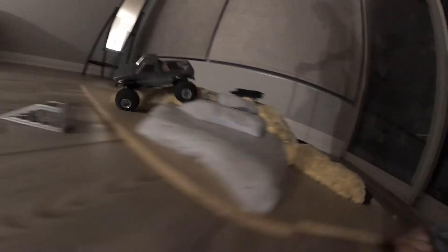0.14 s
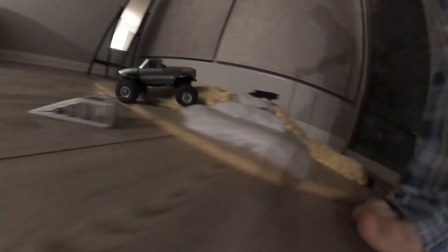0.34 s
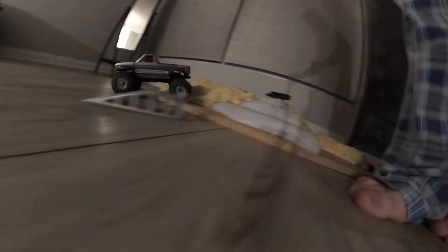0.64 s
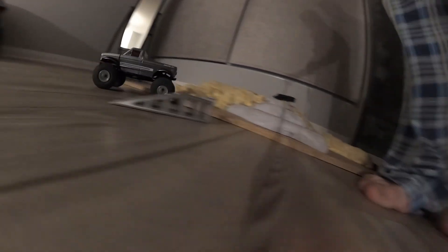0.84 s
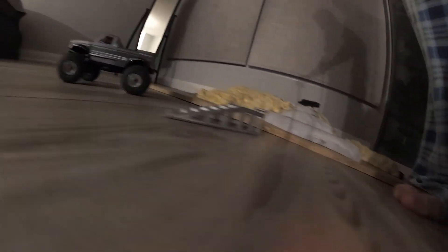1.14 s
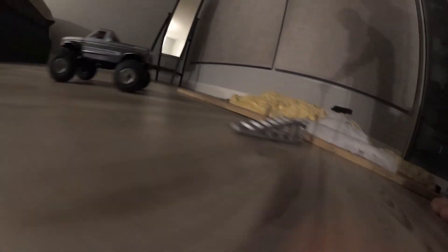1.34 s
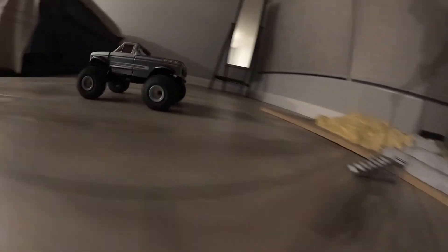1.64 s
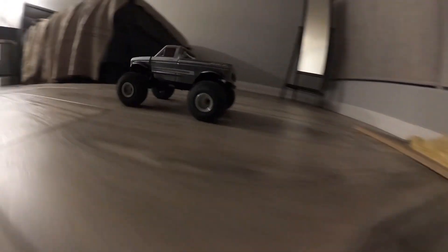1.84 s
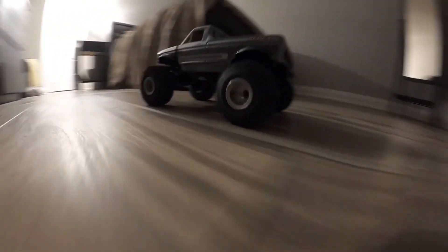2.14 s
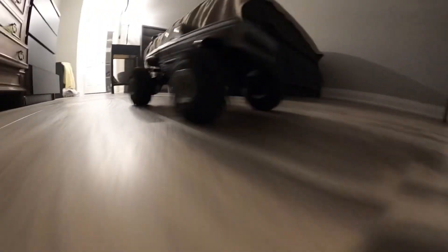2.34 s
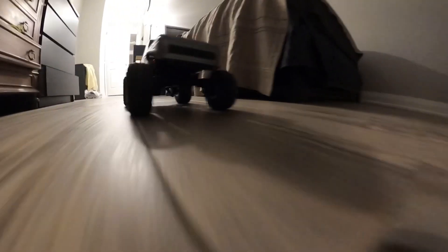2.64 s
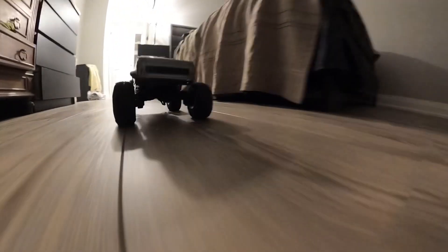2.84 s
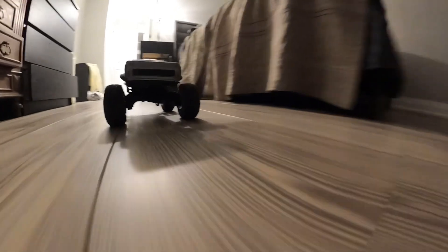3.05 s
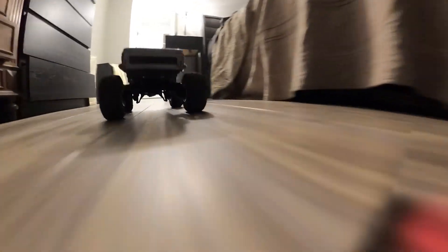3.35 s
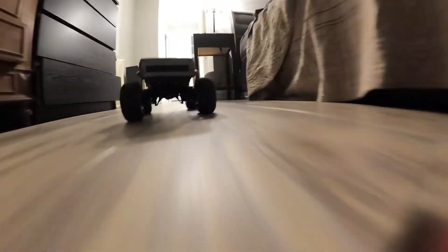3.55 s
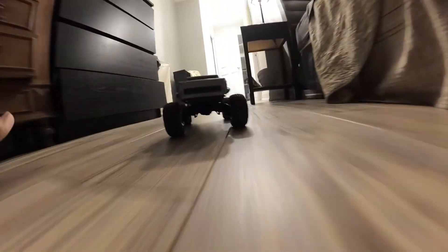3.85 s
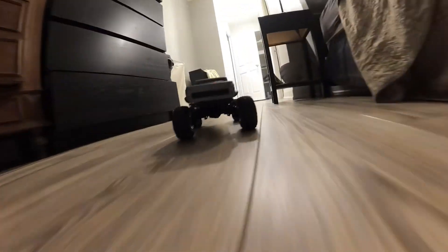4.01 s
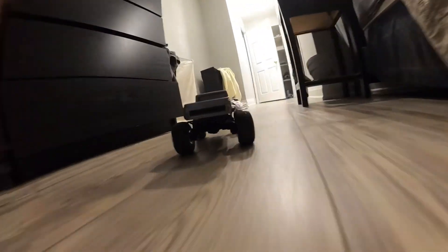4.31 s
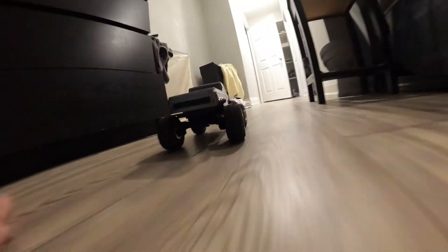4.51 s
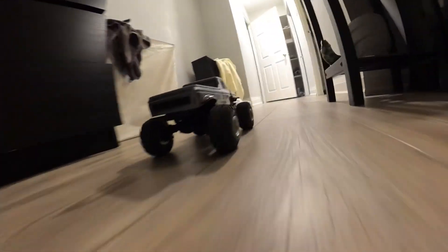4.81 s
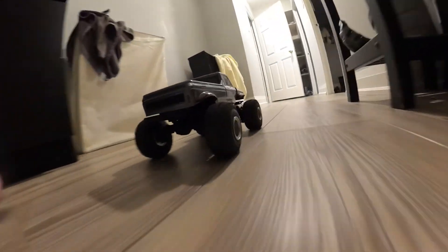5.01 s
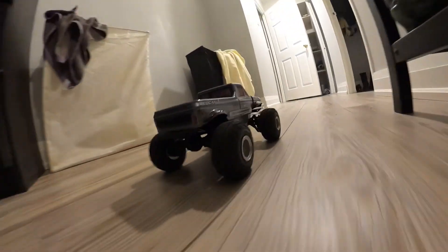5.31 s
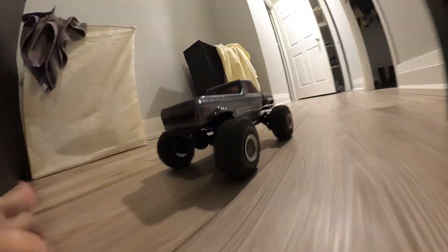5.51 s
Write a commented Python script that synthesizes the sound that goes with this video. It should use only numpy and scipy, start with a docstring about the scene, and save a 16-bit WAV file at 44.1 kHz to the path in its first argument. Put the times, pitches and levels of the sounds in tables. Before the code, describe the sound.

A small remote-controlled truck starts with a dry plastic rattle, then its gear whine swells in, wavers and climbs as it rolls off a ramp over a wooden floor. Light taps and low handling rumble come from the hand-held camera following close by. Past the middle a hard bump thumps loudly, the sound dips briefly, and the buzzing drive continues to the end in a quiet room.

```python
"""A dry plastic rattle comes first, and the whine of a small electric toy truck soon swells through it.
The truck crawls off a ramp and over a wooden floor: wobbling tones make its whine and hum, and noise shaped
by the turning teeth and the chassis resonances makes its rattle. A hand rumbles on the camera that follows,
with sliding tones for knocks and floor thuds. Room noise lies underneath, and one microphone hears it all.
One hard bump against the floor makes the gain control duck and slowly recover."""
import sys
import numpy as np
from scipy import signal
from scipy.fft import rfft, irfft, next_fast_len
from scipy.io import wavfile
from scipy.ndimage import uniform_filter1d, map_coordinates

SR = 44100
rng = np.random.default_rng(int(sys.argv[2]) if len(sys.argv) > 2 else 0)


def int16_out(signal):
    """Quantize to a 16-bit WAV file."""
    q = np.round(np.clip(np.atleast_2d(signal).T, -1, 1) * 32767)
    wavfile.write(sys.argv[1], SR, q.astype(np.int16))


N = 250047
T = np.arange(N) / SR  # time of each sample in s

# quiet room noise: pitch_hz, level_db (relative)
ROOM_COLOUR = [(30, -24), (200, -9), (600, -14), (2000, -15), (15800, -43)]
# tone colour of the hand's rumble: pitch_hz, level_db (relative)
GRIP_COLOUR = [(18, -16), (30, -5), (50, -8), (68, -1), (95, -12.5), (130, -9.5), (250, -17), (450, -31),
               (800, -49)]
# how strongly the hand rumbles on the camera: start_s, level_db
GRIP_LEVEL = [(0.0, -43.5), (0.27, -35), (0.6, -43), (1.04, -41), (1.3, -48), (1.5, -45), (2.14, -41),
              (2.36, -48), (2.6, -41), (2.9, -52), (3.13, -45), (3.4, -43), (3.6, -42), (4.1, -50),
              (4.62, -49), (4.74, -36.5), (5.0, -49.5), (5.18, -38), (5.4, -47), (5.62, -47)]
# knocks on the camera, from finger taps to low nudges and the bump: start_s, level_db, first_pitch_hz
CAMERA_KNOCKS = [(0.069, -23, 503), (0.141, -34, 60), (0.206, -32, 70), (0.266, -31, 403),
                 (0.274, -24.5, 85), (.348, -25, 75), (0.4482, -22, 380), (0.4618, -25, 350),
                 (.482, -25, 292), (.496, -20, 403), (0.51, -17.5, 414), (0.8453, -26, 399),
                 (1.316, -31, 392), (2.056, -27, 453), (3.323, -30, 490), (3.408, -10.5, 131),
                 (3.421, -6.5, 152), (3.4255, 3, 437), (3.4267, -17, 1303), (3.4294, -5, 701),
                 (5.068, -24.5, 404), (5.26, -34, 50), (5.33, -29, 54), (5.54, -27, 45.96),
                 (5.61, -30, 376.3), (5.627, -31, 383)]
# thuds that come up through the floor: start_s, level_db, first_pitch_hz
FLOOR_THUDS = [(3.081, -31.5, 296.5), (3.428, 1, 166), (4.711, -22, 322), (4.857, -23.5, 302.7),
               (5.15, -24.5, 328)]
# the motor drive: start_s, tooth_rate_hz, whine_db (before the speed trim), rattle_db (before jolts)
MOTOR_DRIVE = [(0.0, 980, -61, -34), (0.135, 1011, -44, -32.5), (0.17, 1109, -28.5, -29.5),
               (0.27, 1334, -24.5, -29), (0.35, 1263, -27.5, -29), (0.41, 1069, -33, -30),
               (0.5, 1224, -33, -27.5), (0.62, 1133, -34, -29.5), (0.72, 1430, -34, -24),
               (0.81, 1560, -36, -23), (0.88, 1306, -27, -23.5), (0.97, 1390, -39, -23.5),
               (1.12, 1487, -37, -22.5), (1.6, 1618, -35, -22.5), (1.82, 1937, -30, -21),
               (2.08, 1991, -28, -21), (2.25, 2032, -37, -19), (2.45, 2123, -30, -20),
               (2.95, 2232, -28, -20.5), (3.4, 2310, -39, -19.5), (3.7, 2199, -25.5, -18.5),
               (4.25, 2220, -29.5, -19.5), (4.45, 2336, -31, -20), (4.56, 2192, -34, -19.5),
               (4.85, 2238, -24.5, -19.5), (5.0, 2110, -29, -20), (5.5, 2120, -29.5, -23),
               (5.67, 2115, -40, -22.5)]
# hum of the motor shaft, before a fixed lift: start_s, level_db
SHAFT_HUM = [(0, -49), (1.7, -58), (2.0, -42.5), (2.4, -43.5), (2.9, -55), (3.45, -46.5), (3.7, -58),
             (4.3, -66), (4.6, -54), (5.1, -49), (5.67, -48.5)]
# moments when the truck shows each side to the microphone: start_s
SIDE_TIMES = [.3, .85, 1.9, 2.4, 2.72, 4.3, 4.65, 5.3]
# chassis resonances: pitch_hz, width_hz, then one level_db for each side in turn
CHASSIS_MODES = [(810, 170, -9, -10, -17, -22, -26, -23, -23, -22),
                 (1050, 160, -3, -9, -1, -10, -19, -19, -20, -9),
                 (1350, 340, -7, -6, -9, -16, -22, -21, -16, -13),
                 (1560, 300, -8, -11, -11, -14, -19, -17, -16, -15),
                 (2090, 400, -5, -14, -11, -13, -15, -13, -13, -14),
                 (2480, 430, -1, 0, -7, -11, -11, -13, -11, -11),
                 (2920, 270, -6, -1, 0, -4, -7, -9, -1, -4),
                 (3150, 290, -6, -10, -17, -3, -10, -13, -11, -12),
                 (3490, 320, -4, -4, -3, 0, -26, -25, -13, -2), (3710, 330, -3, -2, -6, -6, -1, -1, -3, -7),
                 (4200, 480, -7, -6, -2, -9, -4, -3, -4, -5),
                 (4450, 240, -15, -11, -6, -8, -5, -2, -26, -9),
                 (5080, 460, -5, -7, -5, -7, -13, -16, -15, -11),
                 (5390, 600, -10, -12, -3, -8, -16, -13, -8, -6),
                 (6050, 900, -13, -13, -10, -15, -19, -13, -15, -15),
                 (6850, 420, -12, -16, -28, -10, -14, -11, -10, -12),
                 (7500, 1400, -22, -16, -11, -13, -34, -32, -12, -14),
                 (8640, 1730, -13, -12, -11, -11, -14, -15, -16, -12)]
# broad part of the rattle, beside the resonances: pitch_hz, level_db (relative)
RATTLE_FIZZ = [(500, -56), (1000, -54), (3000, -19), (9000, -21.5), (10500, -29.5), (12000, -38.5),
               (15800, -44.5)]
# uneven gears swell the rattle: turns_per_motor_turn, depth_db
GEAR_RUNOUT = [(.163, .6), (.327, 1.0), (.654, 1.0), (1, .5)]
# the wheels jolt and the rattle flares: centre_s, rise_db, length_ms (centre to 1/e of the dB rise)
WHEEL_JOLTS = [(.05, 4, 25), (0.271, 4.5, 9.3), (.48, 0, 6.2), (3.6, 7, 87), (4.503, 4, 17), (4.8, 2, 12.9)]

TEETH = 12  # on the motor pinion
KNOCK_FALL_CYCLES, KNOCK_RING_CYCLES = 12.6, 8.2  # cycles of first pitch: to half pitch, to -60 dB
THUD_FALL_S, THUD_RING_S = 0.0043, 0.17  # seconds: to half pitch, to -60 dB
TOP_HZ = 15740  # nothing passes above this


def amp(db):
    """Turn decibels into a plain multiplier."""
    return 10 ** (np.asarray(db) / 20)


def unit(x):
    """Scale x to an average (RMS) level of 1."""
    return x / np.sqrt(np.mean(x ** 2) + 1e-20)


def curves(rows):
    """Draw straight lines between table rows: one curve for each column after the time."""
    s, *cols = np.transpose(rows)
    return [np.interp(T, s, c) for c in cols]


def wobble(rate):
    """A smooth random curve through `rate` random points a second."""
    knots = rng.standard_normal(int(N * rate / SR) + 4)
    return map_coordinates(knots, [T * rate])


def noise():
    """Plain white noise, equally strong at every pitch."""
    return rng.standard_normal(N)


def filtered(x, response):
    """Multiply the spectrum of x by a gain that depends on pitch."""
    m = next_fast_len(N + 8192)
    gain = response(np.fft.rfftfreq(m, 1 / SR))
    return irfft(rfft(x, m) * gain, m)[..., :N]


def shape(points):
    """A gain curve through (pitch_hz, level_db) points on a log pitch axis."""
    hz, db = np.transpose(points)
    return lambda f: amp(np.interp(np.log(f + 1), np.log(hz), db, -120, -120))


def room_air():
    """The quiet of the room: steady noise, strongest in the low tones."""
    return amp(-44.5) * unit(filtered(noise(), shape(ROOM_COLOUR)))


def hand_rumble():
    """The grip on the camera makes low noise, lumpy because its strength wobbles."""
    rumble_db, = curves(GRIP_LEVEL)
    lumpy = amp(3 * wobble(16)) * noise()
    return amp(rumble_db) * unit(filtered(lumpy, shape(GRIP_COLOUR)))


def sliding_hits(rows):
    """Each hit arrives high pitch first and slides down, as bending waves do, while it dies away."""
    out, t = np.zeros(N + SR), np.arange(SR // 2) / SR
    for s, db, hz, fall_s, ring_s in rows:
        cycles = hz * fall_s * np.log1p(t / fall_s)
        onset = 1 - np.exp(-t / .0003)
        fade = amp(db - 60 * t / ring_s)
        out[round(s * SR):][:len(t)] += fade * onset * np.sin(2 * np.pi * cycles)
    return out[:N]


def floor_thuds():
    """Thuds through the floor all slide and ring for the same time, whatever their pitch."""
    return sliding_hits([(s, db, hz, THUD_FALL_S, THUD_RING_S) for s, db, hz in FLOOR_THUDS])


def camera_knocks():
    """Knocks slide and ring for a set number of cycles, so low ones last longer."""
    return sliding_hits([(s, db, hz, KNOCK_FALL_CYCLES / hz, KNOCK_RING_CYCLES / hz)
                         for s, db, hz in CAMERA_KNOCKS])


def shaft_hum(turns):
    """The motor shaft hums once a turn, with a weaker tone an octave up."""
    hum_db, = curves(SHAFT_HUM)
    tone = np.sin(2 * np.pi * turns) + amp(-12) * np.sin(4 * np.pi * turns)
    return amp(hum_db + 3.0 + 2.4 * wobble(17)) * tone


def patchy(x, depth_db):
    """Loose panels come and go: a random gain field over time and pitch."""
    z = signal.stft(x, nperseg=512)[2]
    field = rng.standard_normal(z.shape)
    field = uniform_filter1d(field, size=4, axis=0)  # smooth over pitch
    field = uniform_filter1d(field, size=12, axis=1)  # smooth over time
    return signal.istft(z * amp(depth_db * unit(field)), nperseg=512)[1][:N]


def chassis_response(side):
    """How the plastic chassis colours a blow, as heard from one side."""
    def body(f):
        # each mode acts twice (gearbox, then shell), which keeps the valleys dark
        modes = sum(amp(m[2 + side]) ** 2 / (1 + (2 * (f - m[0]) / m[1]) ** 2) ** 2 for m in CHASSIS_MODES)
        # the shell radiates little below its lowest mode and above its highest
        low_limit = 1 + (700 / (f + 1)) ** 6
        high_limit = 1 + (f / 9600) ** 24
        return np.sqrt(modes / low_limit / high_limit + shape(RATTLE_FIZZ)(f) ** 2)
    return body


def rattle(turns):
    """Every tooth strikes with a chance strength; the side facing the microphone sets the colour."""
    tooth = (turns * TEETH).astype(int)
    strength_db = 0.83 * rng.standard_normal(tooth[-1] + 1)[tooth]
    swell_db = sum(db * np.sin(2 * np.pi * ratio * turns + 0.2 * wobble(5.06)) for ratio, db in GEAR_RUNOUT)
    blows = amp(strength_db + swell_db + 0.69 * wobble(30)) * noise()
    blows = patchy(blows, depth_db=1.4)
    out = np.zeros(N)
    for side, facing in enumerate(np.eye(len(SIDE_TIMES))):
        # one side fades into the next as the truck turns
        out += np.interp(T, SIDE_TIMES, facing) * unit(filtered(blows, chassis_response(side)))
    return unit(out)


def tooth_whine(turns, tooth_hz, whine_db):
    """Meshing teeth whine; play between them grows with speed and shakes timing and depth."""
    backlash = (tooth_hz / 2000) ** 1.1
    shake = backlash * (.9 * wobble(60) + .5 * wobble(160) + .6 * wobble(15))
    cycle = 2 * np.pi * turns * TEETH + shake
    throb_db = backlash * (3.5 * wobble(45) + 2.5 * np.sin(2 * np.pi * GEAR_RUNOUT[0][0] * turns))
    tone = np.sin(cycle) + amp(-9) * np.sin(2 * cycle)
    return amp(whine_db + throb_db - 4.6 * backlash) * tone


def truck():
    """Shaft hum, rattle and tooth whine all follow the same motor speed."""
    tooth_hz, whine_db, rattle_db = curves(MOTOR_DRIVE)
    turns = np.cumsum(tooth_hz) / SR / TEETH
    jolt_db = sum(db * np.exp(-((T - s) * 1000 / ms) ** 2) for s, db, ms in WHEEL_JOLTS)
    rattling = amp(rattle_db + jolt_db) * rattle(turns)
    return shaft_hum(turns) + rattling + tooth_whine(turns, tooth_hz, whine_db)


def scene():
    """Add all the sounds; one microphone feeds both channels."""
    background = room_air() + hand_rumble()
    hits = floor_thuds() + camera_knocks()
    return np.tile(background + hits + truck(), (2, 1))


def gain_control(x, limit_db=-14.0, steepness=1.7, recover_db=7.5, attack_s=0.047):
    """Loud moments pull the gain down over attack_s; it climbs back at recover_db a second."""
    power = np.abs(uniform_filter1d(x[0] ** 2, SR // 50))  # averaged over 20 ms
    level_db = 10 * np.log10(power + 1e-12)
    need_db = steepness * np.maximum(level_db - limit_db, 0)
    cut_db = np.maximum.accumulate(need_db + recover_db * T) - recover_db * T
    eased_db = uniform_filter1d(cut_db, round(attack_s * SR))
    late_db = np.interp(T - 0.55 * attack_s, T, eased_db)  # the gain reacts a little late
    return x * amp(-late_db)


def record(dry):
    """Gain control, a soft ceiling that rounds off peaks, then a cut of the highest tones."""
    x = gain_control(dry)
    rounded = x / (1 + np.abs(x) ** 6) ** (1 / 6)
    return filtered(rounded, lambda hz: hz < TOP_HZ)


dry = scene()
out = record(dry)
int16_out(out)
```